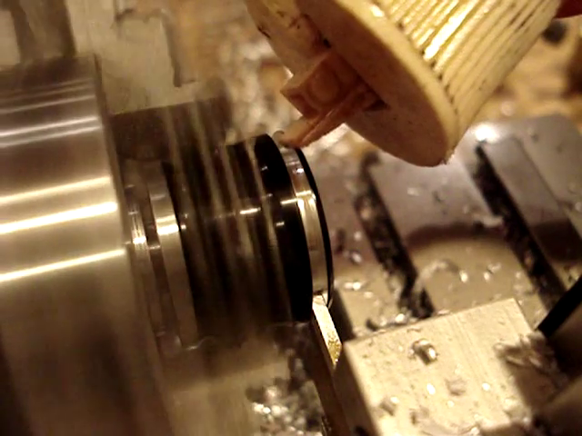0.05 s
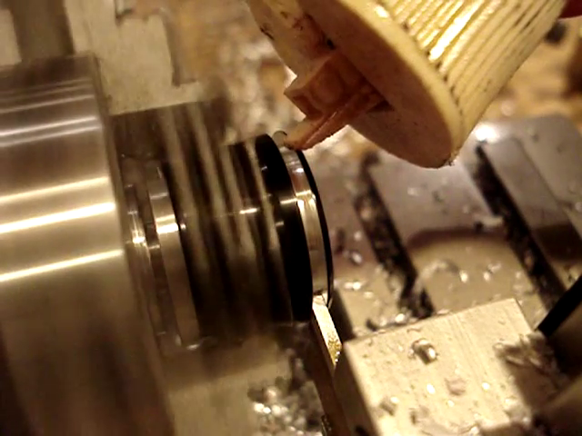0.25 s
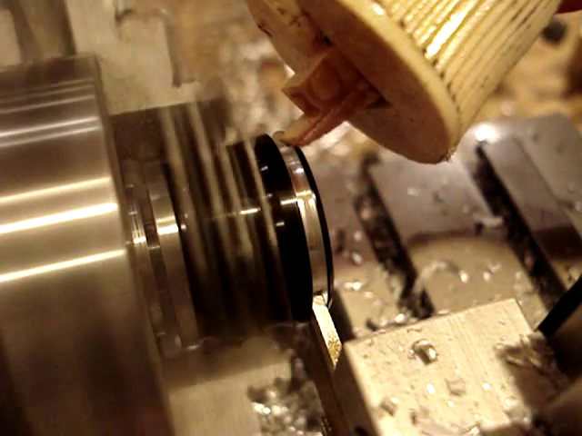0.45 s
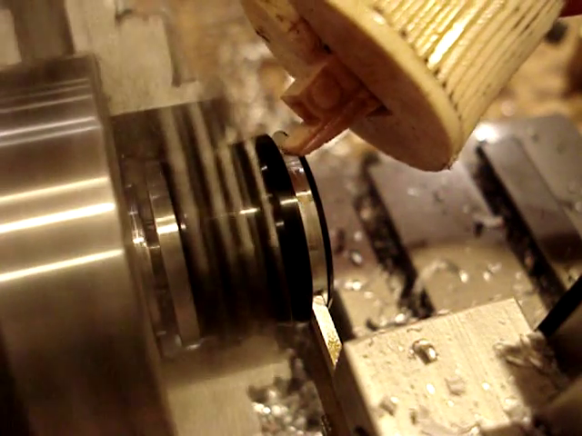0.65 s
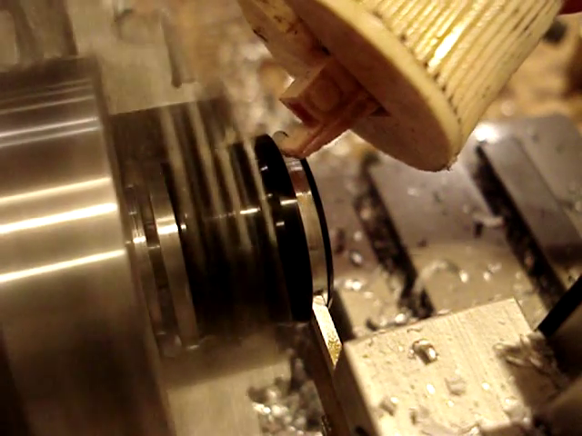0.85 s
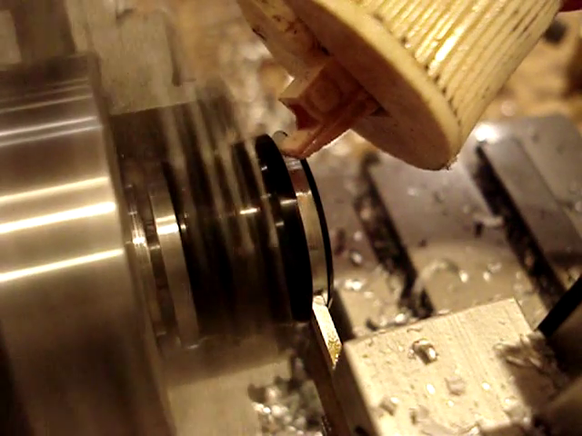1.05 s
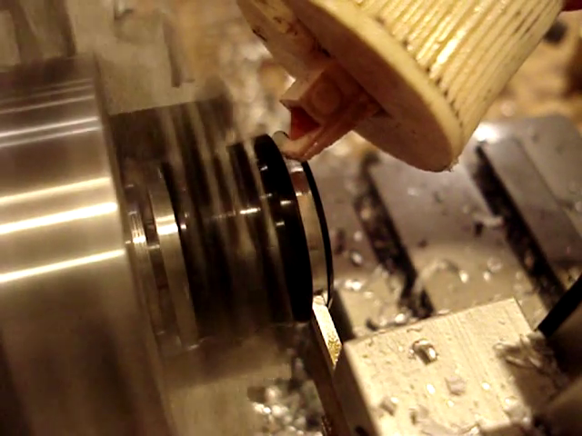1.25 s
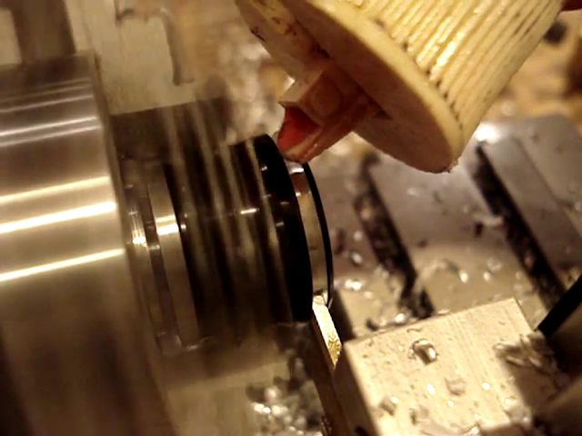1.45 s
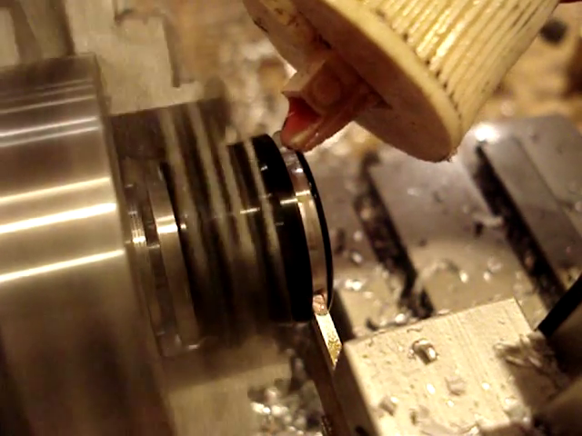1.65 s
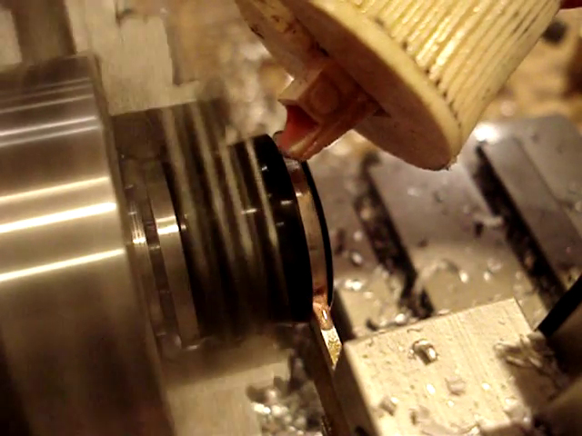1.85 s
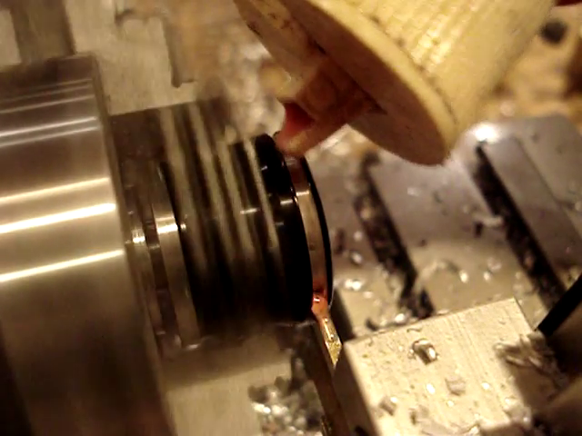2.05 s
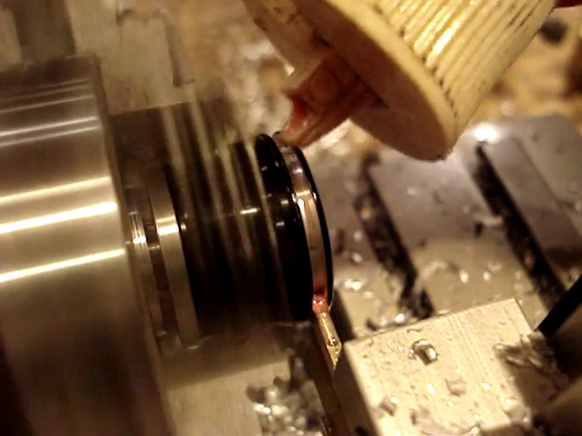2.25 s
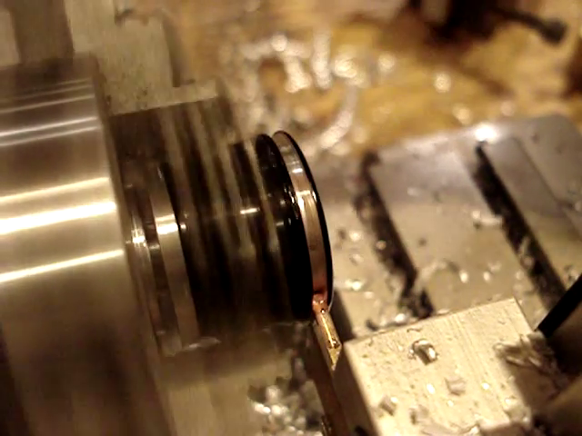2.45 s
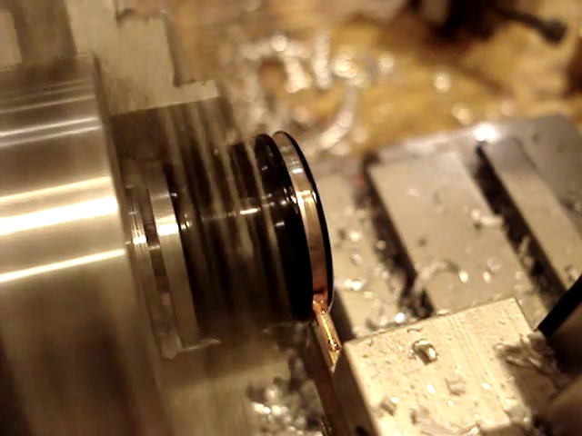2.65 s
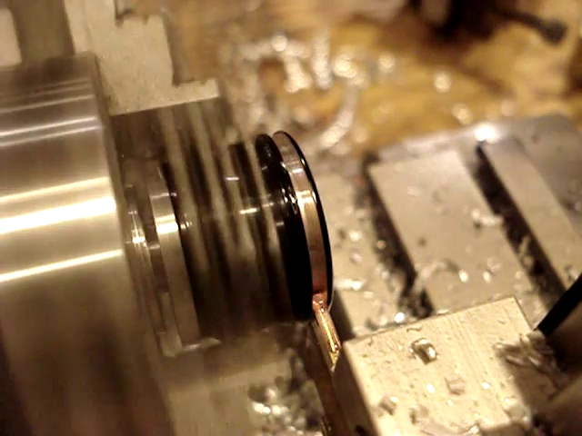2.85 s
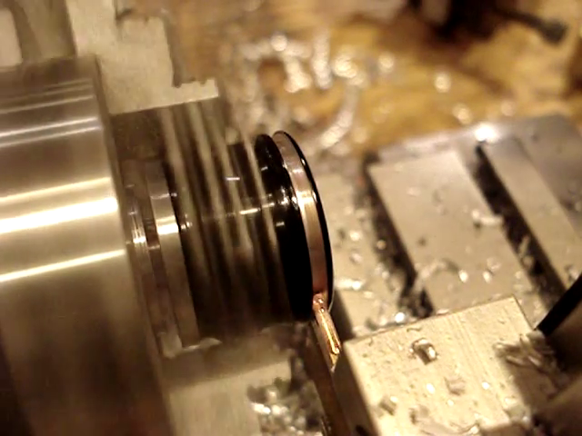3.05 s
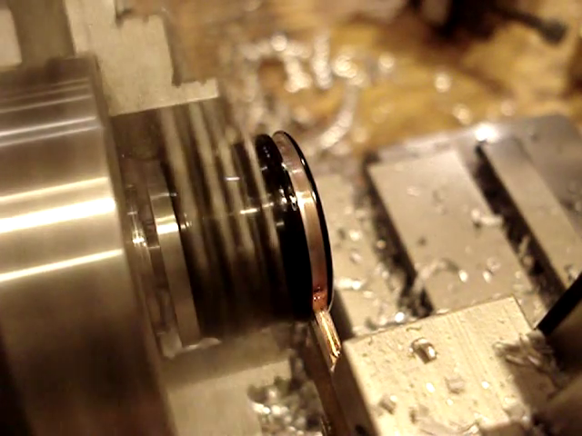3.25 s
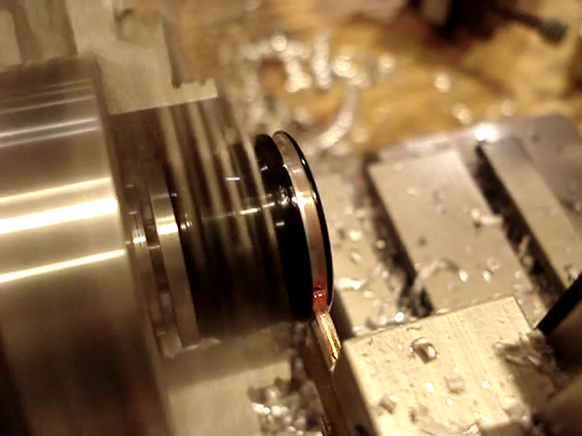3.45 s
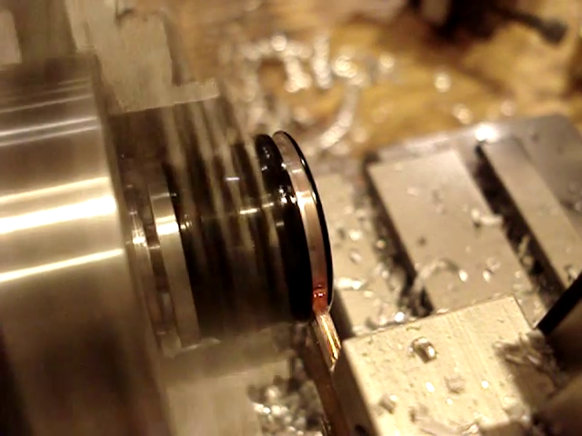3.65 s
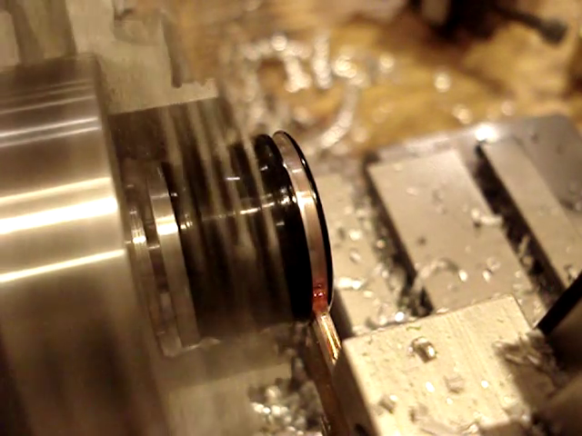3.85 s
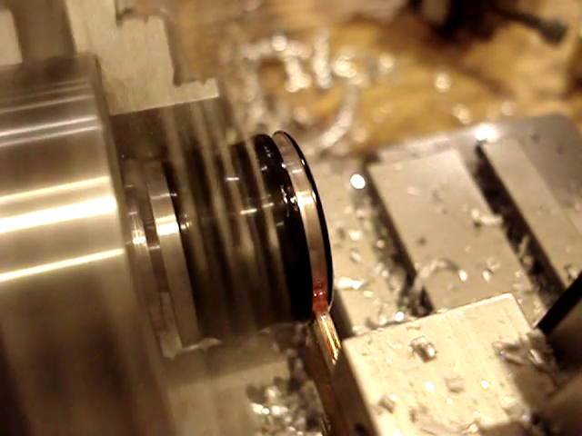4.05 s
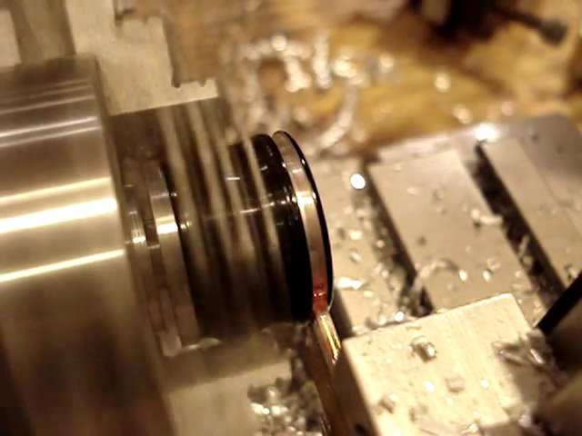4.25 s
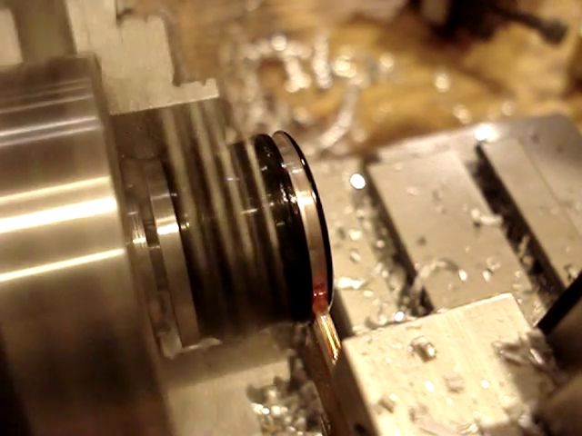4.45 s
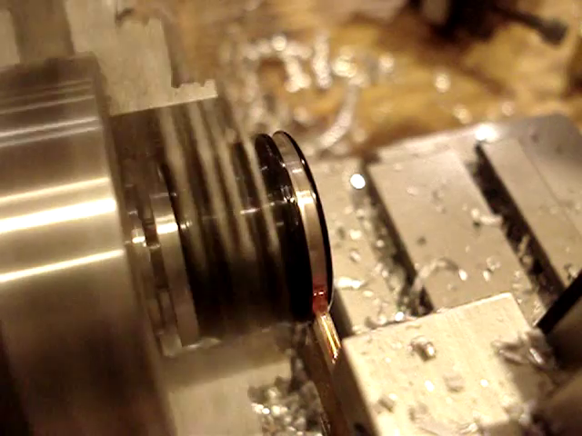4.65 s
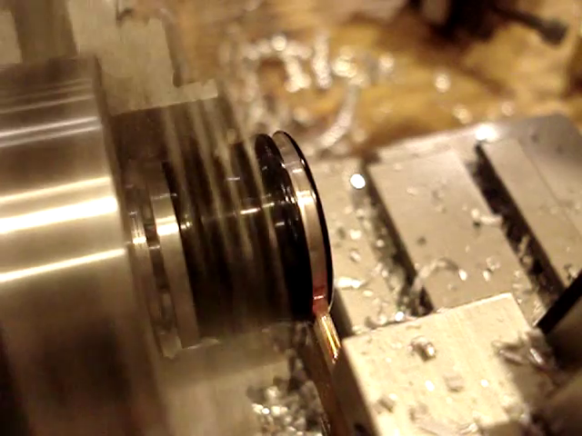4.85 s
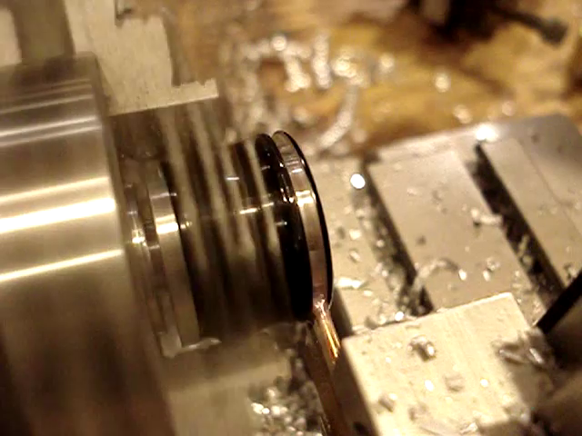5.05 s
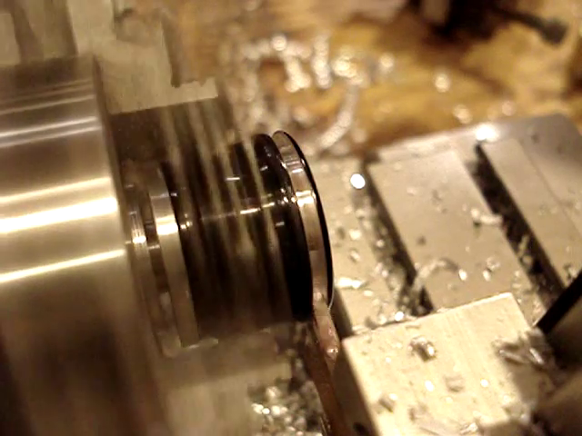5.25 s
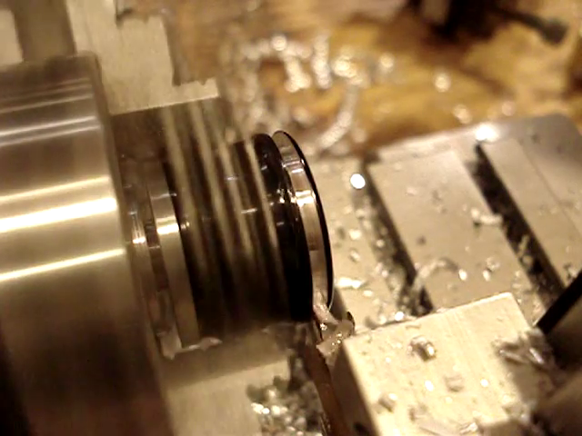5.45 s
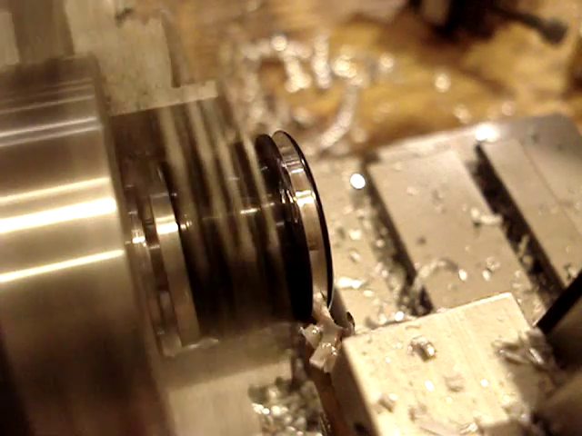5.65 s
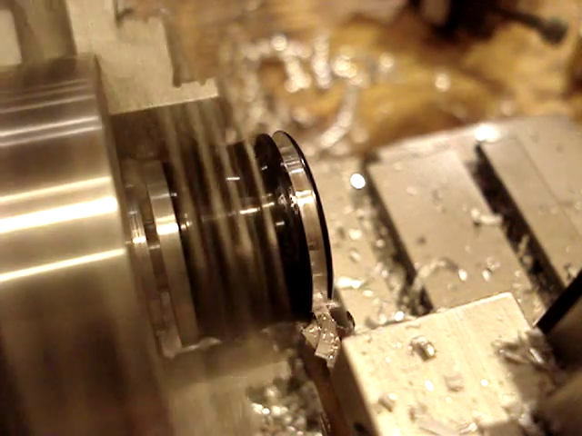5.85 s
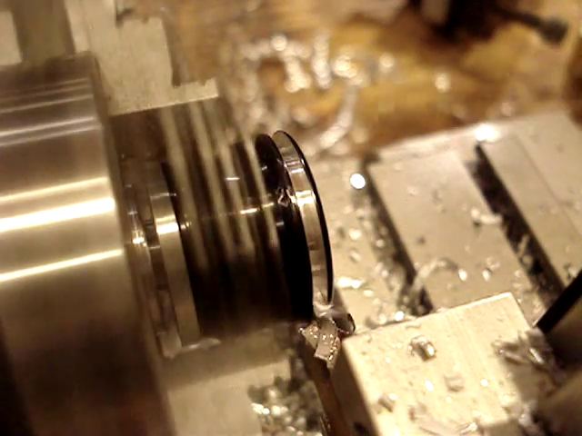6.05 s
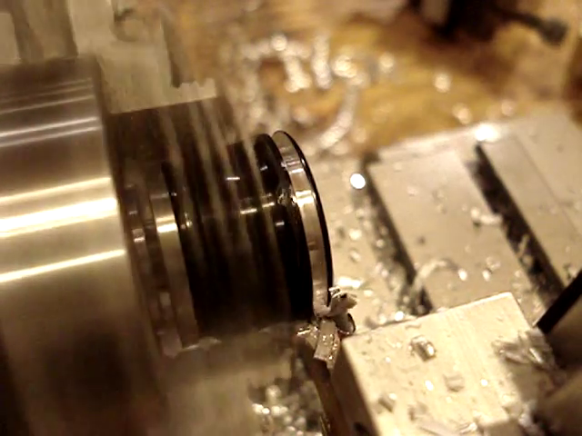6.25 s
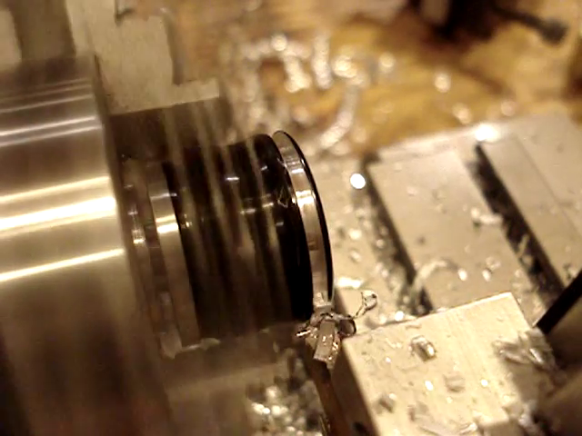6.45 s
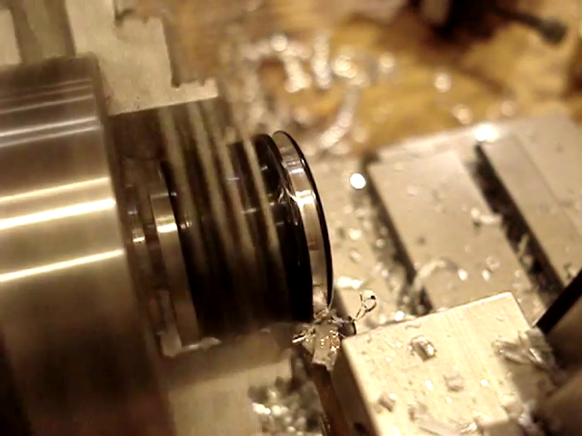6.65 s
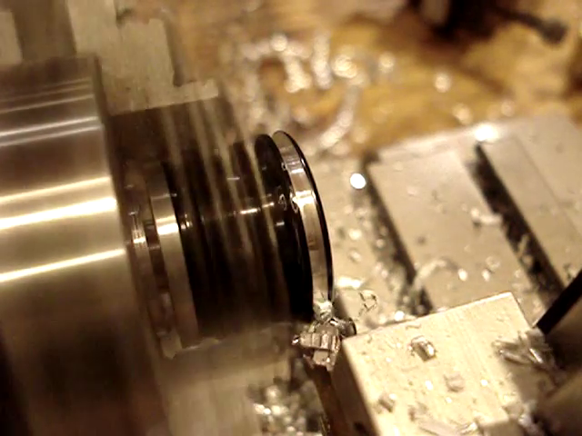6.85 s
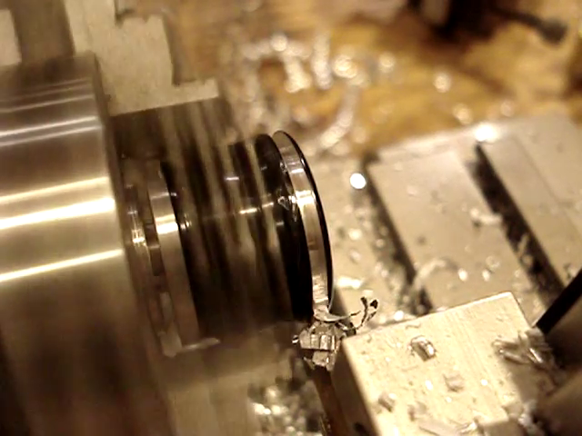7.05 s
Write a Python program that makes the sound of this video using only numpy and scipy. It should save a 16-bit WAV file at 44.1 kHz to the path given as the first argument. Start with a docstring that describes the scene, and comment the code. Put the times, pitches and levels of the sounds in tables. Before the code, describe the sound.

Close to a small lathe in a workshop, a faint motor whine and bearing rush run steadily. A cutting tool rubs a spinning metal ring, making shrill squeaks in a pattern repeated about twelve times a second. Just before five seconds the squeal gives way to a low groan, tearing metal, hiss and hard buzzing chatter, with chips snapping while the motor sags and recovers.

```python
"""A rim squeals at the same spots on every turn, over the whine of a small lathe, close by in a workshop.
A parting tool is fed into the spinning ring: at first it only rubs, exciting the ring's modes.
Near 4.8 s the edge digs in: the squeal gives way to tearing chip, hiss, a groan and blade hum.
Ridges on the groove floor make the tool grab and chatter each turn, chips snap, and the motor sags
and hunts under the load. Modes are shaped noise or sines; all turn-locked sounds share one spindle."""
import sys
import numpy as np
from scipy import signal
from scipy.fft import rfft, irfft, next_fast_len
from scipy.io import wavfile
from scipy.ndimage import uniform_filter1d, map_coordinates

SR = 44100
rng = np.random.default_rng(int(sys.argv[2]) if len(sys.argv) > 2 else 0)


def materialize(psi):
    """Save the field psi as 16-bit PCM at rate SR to the path in sys.argv[1].

    A 1-D psi becomes a single channel; in a 2-D psi each row is a channel.
    """
    bounded = np.clip(np.atleast_2d(psi).T, -1, 1)
    quanta = np.round(bounded * 32767).astype(np.int16)
    wavfile.write(sys.argv[1], SR, quanta)


N = 313110

# spindle speed: (time [s], speed [turns/s])
SPINDLE_SPEED = [(0, 12.316), (4.7, 12.298), (4.95, 12.05), (5.22, 11.55), (5.55, 12.3), (5.87, 11.9),
                 (6.25, 12.32), (6.55, 12.03), (6.8, 12.17), (7.1, 12.2)]
# cutting sound: (time [s], tearing chip and blade hum level [rel dB], chip hiss level [rel dB])
CUT_LEVELS = [(4.62, -54, -44), (4.78, -34, -47.5), (5.0, -25, -48), (5.25, -29, -43), (5.7, -27.5, -41),
              (5.9, -26, -39.5), (6.6, -23.5, -41.5), (7.1, -27.5, -43)]


def amp(db):
    """Amplitude ratio of a level in dB."""
    return 10 ** (np.asarray(db) / 20)


def unit(x):
    """x at rms 1."""
    return x / np.sqrt(np.mean(np.abs(x) ** 2) + 1e-20)


def along(points, hz):
    """(Hz, value) points on a log axis."""
    f, v = np.transpose(points)
    return np.interp(np.log(hz + 1), np.log(f + 1), v)


def curves(rows):
    """One value per sample for each column after the time."""
    s, *cols = np.transpose(rows)
    return [np.interp(np.arange(N) / SR, s, c) for c in cols]


def wobble(rate):
    """A smooth random curve, rate knots a second."""
    knots = rng.standard_normal(int(N * rate / SR) + 4)
    coarse = np.arange(0, N + 8, 8)
    return np.interp(np.arange(N), coarse, map_coordinates(knots, [coarse * rate / SR]))


def filtered(x, response):
    """x times a complex response of frequency."""
    m = next_fast_len(N + SR // 4, True)
    return irfft(rfft(x, m) * response(np.fft.rfftfreq(m, 1 / SR)), m)[:N]


def coloured(x, spectrum):
    """x with a (Hz, dB) spectrum laid on it, at rms 1."""
    return unit(filtered(x, lambda hz: amp(along(spectrum, hz))))


def noise():
    """White noise at rms 1."""
    return rng.standard_normal(N)


def passing(turns, place, length, edge=2):
    """A bell of gain each time a place on the rim comes round; a higher edge makes it flat-topped."""
    away = (turns - place + .5) % 1 - .5
    return np.exp(-np.log(2) / 2 * np.abs(2 * away / length) ** edge)


def capped(x, top):
    """A vibration whose swing levels off smoothly near top."""
    swing = np.abs(signal.hilbert(x, next_fast_len(N))[:N])
    return x / np.sqrt(np.sqrt(1 + (swing / top) ** 4))


def stick_slip(hz, width_hz, knee=0.97):
    """A mode's swing at rms 1: stick and slip keep restarting it, and friction caps its size."""
    drift = wobble(width_hz) + 1j * wobble(width_hz)
    carrier = np.exp(2j * np.pi * hz * np.arange(N) / SR)
    return unit((drift * carrier).real / np.sqrt(knee + np.abs(drift) ** 2))


def toolpost(hz):
    """The summed resonances of blade, holder and slide, alternating in sign."""
    # (centre [Hz], width [Hz], level [dB])
    resonances = [(754, 66, 3.5), (1030, 64, 1), (1437, 116, 0.5), (1723, 77, -2.5), (1790, 66, 2.5),
                  (2142, 17, -13.5), (2267, 82, -9.5), (2750, 31, -24), (2894, 70, -17.5), (3326, 200, -10),
                  (3633, 95, -15), (4010, 108, -14), (4250, 280, -22), (4600, 60, -35)]
    return sum((-1) ** k * amp(db) * 1j * hz * w / (c * c - hz * hz + 1j * hz * w)
               for k, (c, w, db) in enumerate(resonances))


def lathe(turns, octave_db=-9, bearing_db=1.5, whirr_db=-4, frame_db=-7):
    """The drive whines in step with the spindle, over the rush of its bearings."""
    # (time [s], whine level [dB])
    whine_levels = [(0, -56.5), (2.4, -62), (4.6, -58), (5.0, -53.5), (5.3, -55), (5.5, -48), (6.1, -47),
                    (7.1, -50.5)]
    # running machine: (time [s], bearing noise level [rel dB], mid-range whirr level [rel dB])
    machine_levels = [(0, -49.5, -59), (1.42, -51.5, -47.5), (1.58, -52, -58), (2.05, -51.5, -49),
                      (2.3, -55, -71), (3.6, -51, -57), (4.5, -51.5, -64)]
    # running machine spectrum: (frequency [Hz], level [rel dB])
    gear_spectrum = [(25, -2), (150, -9.5), (280, -8.5), (500, -3.5), (650, -5.5), (740, -4.5), (860, 0),
                     (1000, 1.5), (1600, -6.5), (2300, 4), (2800, -2), (3300, -1.5), (4000, -7.5),
                     (5000, -4), (8000, -46)]
    cycles_per_turn = 29.5
    phase = 2 * np.pi * cycles_per_turn * turns
    tone = np.sin(phase) + amp(octave_db + 1.1 * wobble(7.4)) * np.sin(2 * phase)
    whine = amp(curves(whine_levels)[0] + 0.98 * wobble(16)) * np.sqrt(2) * tone

    rush_db, mid_db = curves(machine_levels)
    rush = amp(bearing_db) * coloured(noise(), gear_spectrum)
    rush += amp(frame_db) * unit(filtered(noise(), toolpost))
    whirr = coloured(noise(), [(600, -60.0), (1020, -2), (1250, -4.0), (1900, -31.5)])
    return whine + amp(rush_db) * rush + amp(mid_db + whirr_db) * whirr


def friction(turns, pressure, spread=.25, scatter_db=1.35, drag_db=-6, edge=3.1):
    """Drive of low and high modes: spots pass once a turn; pressure widens them and drags between them."""
    # rough spots: (place [turns], length [turns], low-mode drive [rel dB], high-mode drive [rel dB])
    rough_spots = [(0.107, 0.047, -1, .5), (.16, 0.051, -1, .5), (.22, 0.039, -1.5, 3.5),
                   (0.328, .06, -2, -13.5), (0.389, 0.049, -2, 0), (0.446, 0.034, -32.5, 2.5),
                   (0.492, 0.031, 1, 0.5), (0.548, 0.088, -6, -5), (.615, 0.06, -5, 1.5),
                   (.675, 0.048, -10, 0.5), (.74, 0.065, -3.5, 1), (.98, 0.037, -15, 3.5)]
    power = np.tile((amp(drag_db) * pressure) ** 2, (2, 1))
    for place, length, low_db, high_db in rough_spots:
        on = np.flatnonzero(np.abs((turns - place + .5) % 1 - .5) < 2 * length)
        turn_number = (turns[on] - place + 1.5).astype(int)
        scatter = scatter_db * rng.standard_normal(100)[turn_number]
        rub = amp(scatter) * passing(turns[on], place, length * (1 + spread * pressure[on]), edge)
        power[:, on] += (amp([[low_db], [high_db]]) * rub) ** 2
    return np.sqrt(power)


def squeal(turns, flutter_db=2.3, headroom_db=11.0, scrape_db=-12, firm_scrape_db=-7,
           low_db=1, high_db=1, spray_db=-8):
    """Rough spots set the ring's modes squealing as they slide under the edge; pressure rebalances them."""
    # (time [s], tool pressure [0 light - 1 firm], extra low-mode bite on the rim's high side [dB])
    feed = [(0, 0.088, -4.5), (1.5, 0.047, 2), (1.86, 0.0084, 6), (2.1, 0, 3.5), (3.0, 0.042, 3.5),
            (3.45, 0.53, -1), (4.8, 0.65, 4)]
    # (time [s], low-mode level [rel dB], high-mode level [rel dB])
    squeal_levels = [(0, -29, -35.5), (1.55, -29.5, -35.5), (1.85, -26.5, -36.5), (2.3, -30, -37.5),
                     (2.7, -32.5, -37), (3.0, -31.5, -34.5), (3.5, -32, -30), (4.2, -37, -27),
                     (4.53, -43, -28.5), (4.8, -56, -42)]
    # (frequency [Hz], width [Hz], light-pressure level [rel dB], firm-pressure level [rel dB],
    # steepness of growth with friction [exponent])
    ring_modes = [(5576, 400, -10.5, -19, 0.49), (6272, 670, -1, 4, 1.23), (7220, 1100, -12, -3.5, 1.4),
                  (8330, 520, -8.5, -6.5, 2.4), (8950, 700, -16, -12.5, 2.7)]
    # broad scraping of the edge on the ring: (frequency [Hz], level [rel dB])
    scrape_spectrum = [(3000, -44), (4300, -12), (4830, -12), (5030, 0.5), (5550, -2), (6300, -5),
                       (7300, -7.5), (7800, -3.5), (8400, -22), (9300, -10.5), (10000, -17)]
    split_hz = 7000  # between low and high modes
    mode_swap_db, mode_swap_per_s = 2, 170  # the modes take turns at leading
    nick_place_turns, nick_length_turns = 0.262, 0.027
    nick_hz, nick_width_hz, nick_rel_db, nick_firm_extra_db = 9250, 890, 2.5, 0.5

    pressure, bite_db = curves(feed)
    pressure = np.clip(pressure, 0, 1)
    bite = amp(bite_db * passing(turns, place=.135, length=.12, edge=6))
    drive = friction(turns, pressure)
    drive[0] *= bite
    modes, power = np.zeros((2, N)), np.zeros((2, N))
    for hz, width_hz, light_db, firm_db, steepness in ring_modes:
        high = int(hz > split_hz)
        mix = np.sqrt((1 - pressure) * amp(2 * light_db) + pressure * amp(2 * firm_db))
        rub = drive[high] ** steepness * mix
        swap = amp(mode_swap_db * wobble(mode_swap_per_s))
        modes[high] += rub * unit(stick_slip(hz, width_hz) * swap)
        power[high] += rub ** 2

    # one nick in the rim chirps above the other spots
    chirp = amp(nick_rel_db + nick_firm_extra_db * pressure)
    chirp = chirp * passing(turns, nick_place_turns, nick_length_turns)
    modes[1] += chirp * stick_slip(nick_hz, nick_width_hz)
    power[1] += chirp ** 2

    # levels hold for the average over a turn
    levels = amp(np.array(curves(squeal_levels)) + [[low_db], [high_db]])
    turn_samples = round(SR / SPINDLE_SPEED[0][1])
    gain = levels / np.sqrt(np.abs(uniform_filter1d(power, turn_samples, axis=1)) + 1e-6)
    scrape = amp(scrape_db + firm_scrape_db * pressure) * np.sqrt(np.sum(power * gain ** 2, axis=0))
    scrape = scrape * coloured(noise(), scrape_spectrum)
    # pressed firmly, the edge never leaves the rim and the gaps fill in
    spray = coloured(noise(), [(4500, -47), (6200, 18.5), (8200, -2), (10000, -3.5)])
    spray = amp(spray_db) * pressure * levels.sum(axis=0) * spray
    rubbing = np.interp(np.arange(N) / SR, [4.7, 4.87], [1, 0])
    ring = unit(amp(flutter_db * wobble(900))) * (np.sum(modes * gain, axis=0) + scrape + spray)
    ceiling = np.sqrt(bite) * np.hypot(*levels) * amp(headroom_db - 2 * pressure)
    # the ring hardly radiates below its lowest mode
    return filtered(rubbing * capped(ring, ceiling), lambda hz: 1 - 1 / (1 + (hz / 4250) ** 16))


def draught(turns, puff_db=3.5, eddy_db=-3, push_turns=0.067):
    """Once a turn a puff of air flung off the chuck pushes and pulls at the microphone, with eddies."""
    # (time [s], place in the turn where it arrives [turns], level [rel dB])
    puffs = [(.3, 0.47, -52.5), (1.2, .52, -63), (1.55, 0.28, -54), (3.1, 0.32, -54.5), (3.6, 0.26, -62),
             (4.25, 0.71, -55.5), (4.7, 0.46, -80), (6.6, 0.39, -60), (7.1, .42, -66)]
    place, db = curves(puffs)
    u = ((turns - place + 0.014 * wobble(10) + .5) % 1 - .5) / push_turns
    push = 2 * u * np.exp(-np.abs(u))
    rush = coloured(noise(), [(10, 0.5), (35, -6.5), (100, -2.5), (220, -13.5), (500, -27.5), (1500, -69)])
    eddies = passing(turns, place, length=0.14) * rush
    return amp(db + puff_db + 2.2 * wobble(4.8)) * (push + amp(eddy_db) * eddies)


def groan(swell_db=3.0):
    """The slide shudders at a lower pitch than the blade as it takes up the load."""
    # (time [s], level [dB])
    groan_levels = [(4.62, -60.5), (4.9, -42.5), (5.1, -37.5), (5.4, -46), (7.1, -57)]
    start = np.interp(np.arange(N) / SR, [4.5, 4.62], [0, 1])
    shudder = stick_slip(hz=602, width_hz=200) * amp(swell_db * wobble(80))
    return start * amp(curves(groan_levels)[0]) * unit(shudder)


def cutting(ring_db=-5.0, tear_db=-5, hiss_db=3.5, grain_db=3, soft_hz=2000):
    """The chip tears off in uneven lumps that shake the toolpost, and hisses over the blade."""
    # (frequency [Hz], level [rel dB])
    tear_spectrum = [(30, -45), (130, -25.5), (240, -35.5), (420, -17), (560, -13), (800, -1), (1060, -3),
                     (1300, -16), (2200, -11.5), (3100, -17), (4300, -19.5), (6000, -47), (9000, -56)]
    # (frequency [Hz], level [rel dB])
    hiss_spectrum = [(3000, -18), (5200, 2.5), (6000, 6), (6800, 15), (7500, 3), (9200, 4), (9750, 10.5),
                     (10200, -4.5)]
    chip_db, slide_db = curves(CUT_LEVELS)
    t = np.arange(N) / SR
    lumps_db = 1.7 * wobble(170) + 1.5 * wobble(60)
    lumps = unit(amp(lumps_db + grain_db * wobble(1500)))
    force = amp(chip_db) * lumps * np.interp(t, [4.6, 4.7], [0, 1])
    shaken = unit(filtered(force * noise(), lambda hz: toolpost(hz) / (1 + 1j * hz / soft_hz)))
    body = amp(ring_db) * shaken + amp(tear_db) * coloured(force * noise(), tear_spectrum)
    hiss = amp(slide_db + hiss_db + 2.65 * wobble(200)) * coloured(noise(), hiss_spectrum)
    hiss = hiss * np.interp(t, [4.7, 4.87], [0, 1])
    return np.sqrt(np.mean(force ** 2)) * body + hiss


def singing(blade_hz, width_hz=90, swell_db=4.0):
    """The chip keeps the blade humming on one of its modes, more so once it packs the groove."""
    t = np.arange(N) / SR
    drift = wobble(width_hz) + 1j * wobble(width_hz)
    swing = drift / np.sqrt(1 + np.abs(drift) ** 2) * np.exp(2j * np.pi * blade_hz * t)
    share = np.interp(t, [4.68, 4.7, 4.9, 5.6, 6.2], [0, .9, .4, .4, .7])
    return share * amp(curves(CUT_LEVELS)[0]) * unit(swing.real * amp(swell_db * wobble(90)))


def grabs(turns, ridge):
    """A grab per ridge pass: (middle s, length s, Hz, swing dB, octave rel dB, rattle rel dB)."""
    shallow_s, bite_adds_s = 0.0112, 0.0067
    chatter_hz, bite_sag_hz, scatter_hz = 798.2, 60.5, 9.97  # the swing is slower in a deep bite
    octave_db, bite_octave_db, scatter_db = -19, 18, .8  # a deep bite distorts the swing
    place, db, bite, rattle_db = curves(ridge)
    at = np.flatnonzero(np.diff(np.floor(turns - place)) > 0)
    at = at[at / SR > ridge[0][0]]
    depth = np.clip(bite[at], 0, 1)
    chance = rng.standard_normal((len(at), 2))
    swing_hz = chatter_hz - bite_sag_hz * depth + scatter_hz * chance[:, 0]
    swing_db = db[at] + scatter_db * chance[:, 1]
    return list(zip(at / SR, shallow_s + bite_adds_s * depth, swing_hz, swing_db,
                    octave_db + bite_octave_db * depth, rattle_db[at]))


def snaps():
    """A breaking chip is a brief grab on the blade's second mode; same columns as the grabs."""
    # (time [s], level [rel dB])
    chip_breaks = [(4.9454, -19), (5.237, -18), (5.3338, -17), (5.422, -22.5), (5.8529, -18), (6.0332, -14),
                   (6.105, -22.5), (6.1955, -12.5), (6.2801, -11), (6.364, -19), (6.467, -16),
                   (6.6064, -13), (6.6189, -10.5), (6.7087, -13.5)]
    length_s, hz, offset_db, octave_db, rattle_db = 0.0079, 1011, -4, -9, -9
    return [(s, length_s, hz, db + offset_db, octave_db, rattle_db) for s, db in chip_breaks]


def chatter(turns, droop=.06, jitter=0.0241, grit=1.4, edge=4, rattle_hz=1400, sharpness=32):
    """In each grab the blade swings, slowing as it bends, and strikes the work once a swing."""
    # ridges on the groove floor catch the edge once a turn and creep round the rim:
    # (time [s], place [turns], swing level [dB], depth of bite [0-1], rattle level [dB rel swing])
    first_ridge = [(4.845, .085, -18, 0.07, -6), (5.099, .07, -16.5, 0, -4.5),
                   (5.219, 0.086, -20.5, 0.43, -6), (5.55, 0.051, -22, 0.03, -0.5),
                   (5.72, 0.065, -18.5, 0, -6.5), (5.978, .16, -21, .2, -11), (6.15, .19, -20, 0.1, -1),
                   (6.4, 0.29, -17, 0.79, -1.5), (7.1, 0.44, -18.5, 0.91, 1)]
    # same columns
    second_ridge = [(5.71, 0.41, -22, 0.34, -16), (5.999, .45, -20, .7, -3), (6.349, .42, -20, 0.72, 0.5),
                    (6.62, .49, -16.5, .6, -7.5), (7.1, 0.54, -22, 0.76, -5.5)]
    t = np.arange(N) / SR
    waver = 1 + jitter * wobble(400)
    swing, drive, blows = np.zeros(N), np.zeros(N), np.zeros(N)
    events = snaps() + grabs(turns, first_ridge) + grabs(turns, second_ridge)
    for s, length_s, hz, db, octave_db, rattle_db in events:
        span = slice(int((s - .04) * SR), int((s + .04) * SR))
        u = (t[span] - s) / max(length_s, 1e-3)
        # seizes abruptly, lets go more slowly
        size = amp(db) * np.exp(-np.abs(1.92 * u) ** np.where(u < 0, 7, 3))
        cycles = np.cumsum(hz * waver[span] * (1 - droop * np.clip(u, -1, 1))) / SR
        phase = 2 * np.pi * (cycles + rng.random())
        octave = amp(octave_db) * np.sin(2 * phase + rng.normal(-1.47, 1.0))
        swing[span] += np.sqrt(2) * size * (np.sin(phase) + octave)
        # blows are hardest just before the middle of the grab
        force = amp(db + rattle_db) * np.exp(-np.abs(2.77 * (u + 0.038)) ** edge)
        drive[span] += force ** 2
        blows[span] += force * np.exp(sharpness * (np.cos(phase) - 1))
    blows = blows * (1 + grit * noise())
    clatter = filtered(blows, lambda hz: toolpost(hz) * (1j * hz / (rattle_hz + 1j * hz)) ** 4)
    swing = swing * amp(.7 * wobble(300))
    return swing + unit(clatter) * np.sqrt(drive.mean())


def workshop(x):
    """The short answer of the lathe bed and nearby walls: decaying noise."""
    # (frequency [Hz], 60 dB decay time [s])
    decay_times = [(200, 0.31), (1000, 0.024), (3000, 0.062), (10000, 0.1)]
    hz, t, z = signal.stft(rng.standard_normal(SR // 3), SR, nperseg=256)
    decay = amp(-60 * t / along(decay_times, hz)[:, None])
    tail = signal.istft(z * decay, SR, nperseg=256)[1]
    return signal.fftconvolve(x, np.pad(tail, (SR // 400, 0)) / np.linalg.norm(tail))[:N]


def scene(squeal_room_db=-24, cut_room_db=-13):
    """The lathe, squeal, draught and chatter follow the spindle; the room answers the tool."""
    turns = np.cumsum(curves(SPINDLE_SPEED)[0]) / SR
    rub = squeal(turns)
    hum = amp(1.0) * singing(blade_hz=784, width_hz=60) + amp(-7.5) * singing(blade_hz=1007, swell_db=3.5)
    cut = chatter(turns) + cutting() + groan() + hum
    room = workshop(amp(squeal_room_db) * rub + amp(cut_room_db) * cut)
    return (rub + cut + room + lathe(turns) + draught(turns))[None]


def record(dry, top=.6, band_limit_hz=10080):
    """The highest peaks round off below top, and a steep low-pass ends the band."""
    held = dry[0] / (1 + np.abs(dry[0] / top) ** 6) ** (1 / 6)
    return filtered(held, lambda hz: amp(-np.clip((hz - band_limit_hz) / 5, 0, 120)))[None]


dry = scene()
out = record(dry)
materialize(out)
```